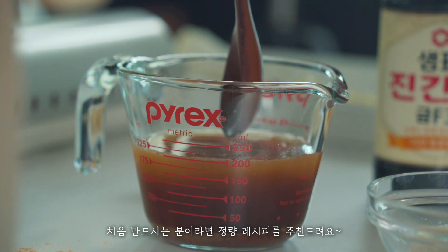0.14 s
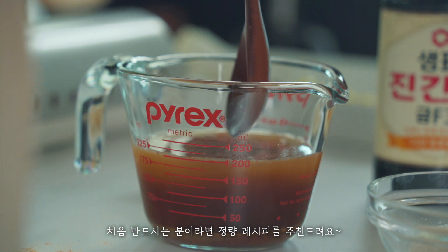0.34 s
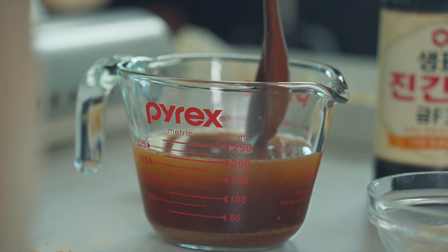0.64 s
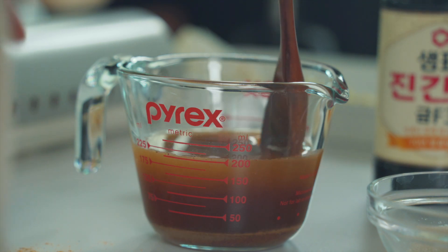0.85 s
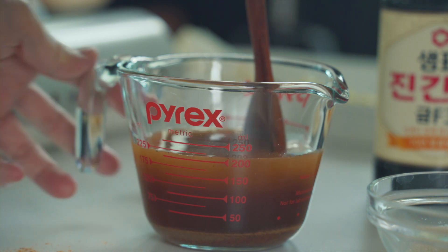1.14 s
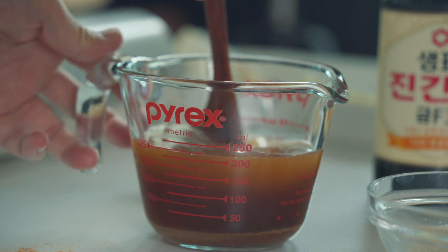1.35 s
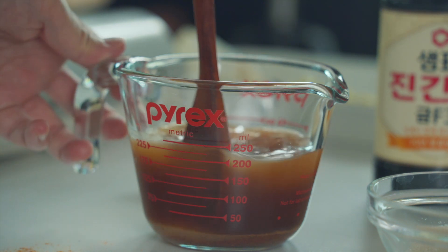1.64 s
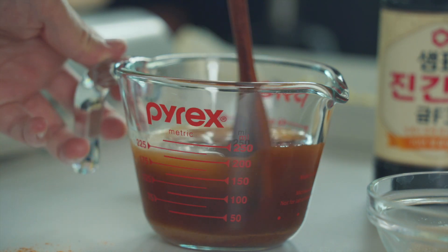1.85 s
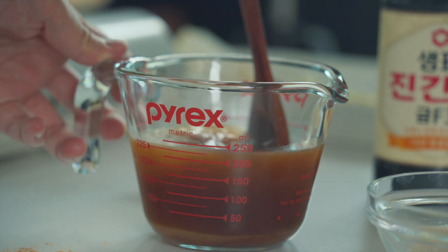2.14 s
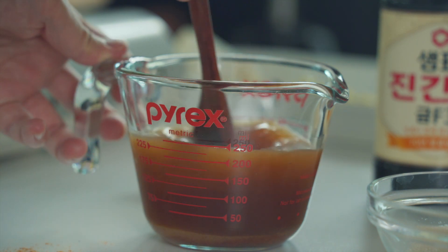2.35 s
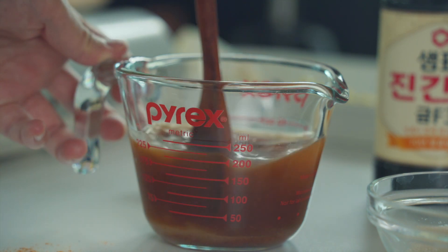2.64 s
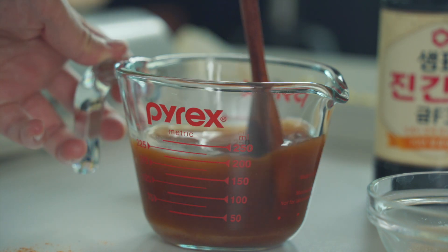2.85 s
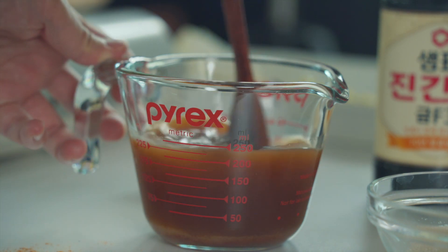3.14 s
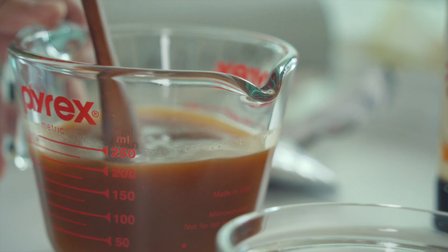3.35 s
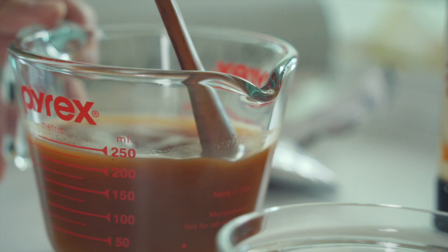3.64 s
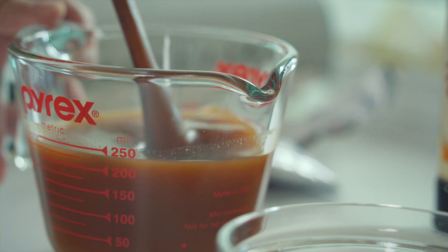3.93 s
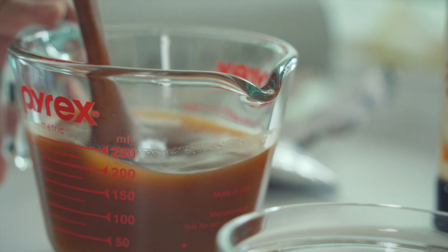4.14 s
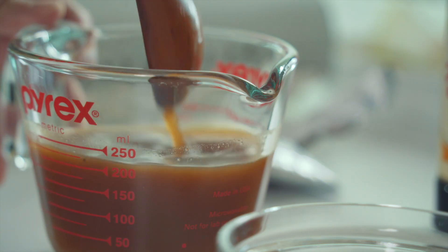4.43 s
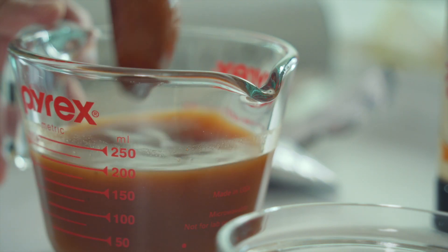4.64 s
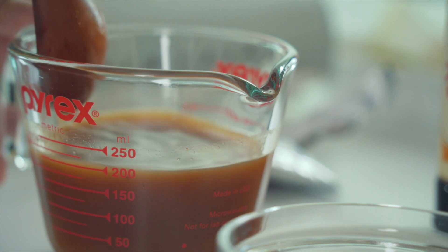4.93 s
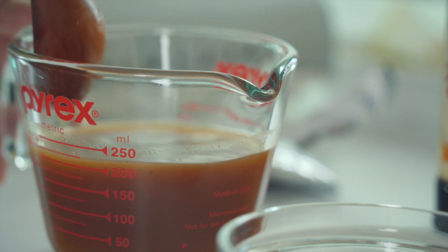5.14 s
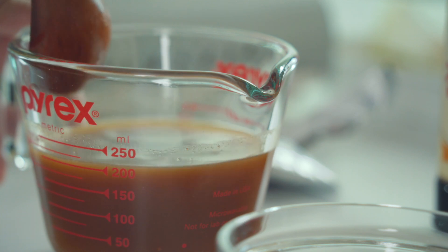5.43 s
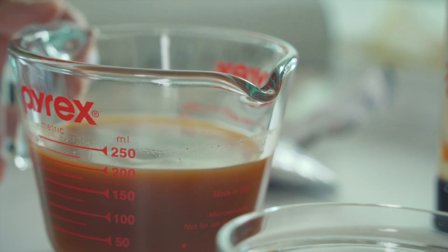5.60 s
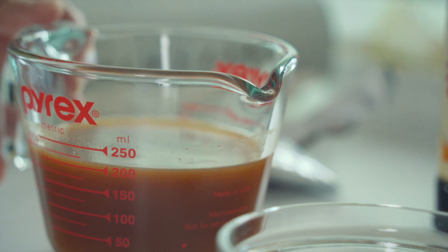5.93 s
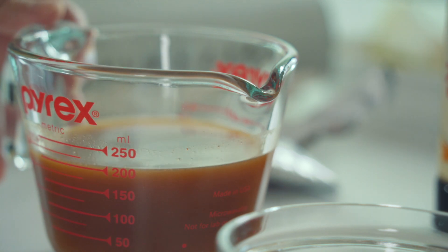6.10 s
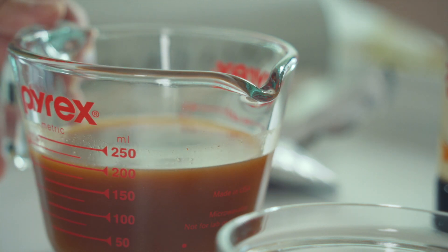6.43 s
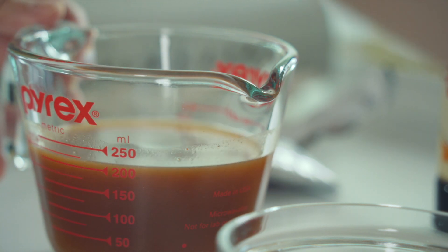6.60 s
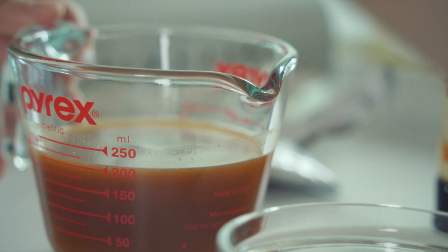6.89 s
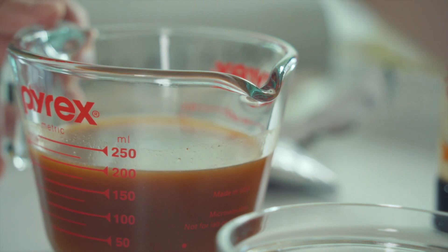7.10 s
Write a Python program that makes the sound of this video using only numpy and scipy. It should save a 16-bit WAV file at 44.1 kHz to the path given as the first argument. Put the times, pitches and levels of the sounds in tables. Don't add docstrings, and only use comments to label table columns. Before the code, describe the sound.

Close in a quiet, hard-walled kitchen with low room tone and soft hiss, a dull knock lands on the worktop with small rattles. A wooden spoon then stirs a thick glass jug with faint scuffs and irregular muted taps, densest around three seconds. Two rim knocks follow, the second harder. Finally a dish is set down and glass bowls clack brightly off to the side.

```python
import sys
import numpy as np
from scipy import signal
from scipy.fft import rfft, irfft, next_fast_len
from scipy.io import wavfile
from scipy.ndimage import uniform_filter1d

SR = 44100
rng = np.random.default_rng(int(sys.argv[2]) if len(sys.argv) > 2 else 0)


def undo_db(level):
    steps = np.asarray(level, float) / 20
    return 10 ** steps


def persist_wave(psi):
    counts = np.round(np.clip(psi, -1, 1) * 32767).astype(np.int16)
    wavfile.write(sys.argv[1], SR, np.atleast_2d(counts).T)


N = 320166


# f/Hz, level/dB per Hz
ROOM_HISS = [(12, -38), (20, 2), (88, -4), (141, -8), (181, -8.5), (233, -12), (354, -14.5), (430, -17),
             (635, -16), (839, -20), (1050, -21.5), (2170, -31), (3110, -32.5), (15700, -39.5)]
# f/Hz, t60/s
WALL_DECAY = [(125, 0.48), (500, 0.55), (2000, 0.47), (6000, 0.45), (12000, 0.44)]
WET_DB = {"jug": -7, "top": -4.5, "dish": -3, "bowl": -5.5}
# start t/s, peak t/s, end t/s, peak level/dB, brightness/6 dB steps
SLEEVE_STROKES = [
    (0.34, 0.397, 0.45, -69, 1.27),
    (.6, 1.023, 1.2, -73, -0.2),
    (5.853, 6.305, 6.8, -70.5, -0.08),
]
# f/Hz, level/dB per Hz
SHIVER_SPECTRUM = [(4900, -22), (6000, -20), (6600, 0), (7200, -18), (7900, -16), (8450, -3), (9100, -20),
                   (12000, -30)]

# t/s, board level/dB, then boom and high ring level/dB above it
KNOCKS = [
    (0.1216, -27, -17, -17),
    (0.133, -51, 11, -30),
    (.305, -48, -14, -30),
    (.315, -60, 7.5, -25),
    (.368, -50.5, -4, -2),
    (.409, -69.5, 9, -20),
]
# group, f/Hz, level/dB, t60/s
WORKTOP_MODES = [(0, 250, -9, 0.052), (0, 350, -13, 0.12), (0, 500, -5.5, 0.054), (0, 580, -1.5, .04),
                 (0, 752, -7, 0.016), (0, 921, -0.5, 0.043), (1, 69, -3, .2), (1, 96.5, 1.5, 0.23),
                 (1, 125, 1, 0.29), (2, 1480, 4, 0.033), (3, 2560, -3, .012)]
# low f/Hz, high f/Hz, level/dB, t60/s
WORKTOP_CRACK = [(150, 950, -8.5, 0.035), (50, 200, -15, 0.041), (1500, 3400, 5, .025),
                 (2260, 7000, 4.5, 0.0078), (4950, 10000, 10, 0.0034)]

# t/s, low ring level/dB
DISH_SETS = [
    (6.4222, -25),
]
DISH_SHARES_DB = (0, -4, -29.5, -28.5)
# group, f/Hz, level/dB, t60/s
DISH_MODES = [(0, 1000, -11, 0.015), (0, 1180, -10, 0.03), (0, 1304, 3, 0.076), (0, 1350, -9.5, 0.11),
              (0, 1505, -6, 0.039), (1, 2060, -3, 0.049), (1, 2130, -1, 0.048), (1, 2580, 1, .015),
              (2, 3080, -4, .11), (2, 3420, -13, .04), (2.001, 3500, -18, .1), (3, 4900, -11, .05),
              (3, 6500, 3, .015), (3, 6700, -6, .05), (4, 113.3, -1, 0.52)]
# low f/Hz, high f/Hz, level/dB, t60/s
DISH_CRACK = [(420, 1700, -7.5, 0.01), (1730, 2700, 0, 0.021), (2520, 3500, 0.5, 0.014),
              (4500, 11000, 3, .045), (80, 310, -6, 0.041)]
# t/s, level/dB, bright share level/dB
DISH_SLIDES = [
    (6.775, -70, -12.5),
    (6.868, -61.5, -9),
    (6.908, -59, -12),
    (6.922, -63, -12),
]
# low f/Hz, high f/Hz, level/dB, t60/s
SLIDE_BANDS = [(2250, 3500, 0.5, 0.04), (4500, 7000, -3, .03)]

# t/s, low ring level/dB, then second, third, bright rings level/dB above it
CLACKS = [
    (7.0005, -32, 14, -11, -33),
    (7.003, -20.8, 12, 14.5, 9.5),
    (7.0215, -29, 6, 14, -8),
    (7.0406, -27.5, 12.8, -4, -15),
    (7.0545, -32.5, 10, 13, -4),
    (7.0644, -39, 12, -3, 8),
]
# group, f/Hz, level/dB, t60/s
BOWL_MODES = [(0, 115.1, -31, 0.58), (0, 890, -8.5, 0.017), (0, 1170, -5, 0.036), (0, 1315, -1, 0.065),
              (1, 2360, 1.5, 0.017), (1, 2518, -3.5, 0.032), (2, 3300, -5.5, 0.011), (2, 3470, 1.5, 0.023),
              (3, 4440, -1.5, 0.016), (3, 4955, -9.5, 0.06), (3, 5280, 5.5, 0.024), (2.999, 5900, -5, .01),
              (3, 6300, -3.5, 0.02), (3, 6694, -2, 0.043), (4, 7800, 1, 0.0097), (4.001, 8400, 2.5, 0.011),
              (4, 9280, -11.5, 0.015), (4, 10240, -13, 0.021)]
# low f/Hz, high f/Hz, level/dB, t60/s
BOWL_CRACK = [(280, 4600, -5.5, 0.029), (1670, 3680, -5, 0.014), (2740, 3240, -7, 0.0092),
              (4340, 8700, -6, 0.011), (7500, 14800, -12.5, 0.012)]

# peak t/s, level/dB, fizz share
DRAGS = [
    (2.6, -80.5, 0.23),
    (2.75, -70, .3),
    (2.87, -65.5, .2),
    (2.95, -78, 0.45),
    (3.08, -73, .5),
    (3.17, -62, 0.5),
    (3.42, -74, .85),
    (3.52, -75, .28),
]
# group, f/Hz, level/dB, t60/s
SCUFF_MODES = [(0, 945, 0, 0.023), (0, 1480, -7.5, 0.028), (0, 1670, -4, 0.018), (0, 2120, -3, 0.025),
               (0, 2554, -4, .02), (0, 3790, -11, 0.025), (0, 4245, -12, .04)]
# t/s, ring level/dB, tick level/dB above it
RIM_SHAKES = [
    (4.9325, -46, -24),
    (5.381, -40.5, 2.5),
]
# group, f/Hz, level/dB, t60/s
RIM_MODES = [(0, 6700, -18, .01), (0, 8200, -13, 0.018), (0, 13700, -12, .01), (1.001, 215, -7.5, 0.08),
             (1.001, 400, -9, 0.08), (1, 516, -7, .03), (0.998, 1150, -8, .03), (2, 1478, 4.5, 0.11),
             (3.001, 2150, -8.5, .06), (3, 2578, 5, 0.008), (4, 3350, 5, 0.016), (4, 3750, -5.5, .06),
             (4, 4250, -6.5, 0.085)]
# low f/Hz, high f/Hz, level/dB, t60/s
RIM_CRACK = [(4960, 15400, -1.5, 0.015), (183, 1300, 5, 0.046), (1260, 2270, -6.5, 0.0078),
             (1900, 2660, 5, 0.016), (2820, 4800, 2, 0.0072)]
# t/s, tick level/dB, then thud and high rings level/dB above it
EDGE_TICKS = [(1.2248, -63, -8, -14), (1.3294, -64, -16, -21), (2.1824, -70.5, 7, 3.5),
              (2.274, -47.5, -5.5, -9.5), (2.7544, -62.5, -1, -9), (2.8501, -59, -1.5, -16),
              (2.9286, -68.5, 2, 0), (3.0057, -63.5, -10, -8), (3.089, -59, -3, -4), (3.117, -59, -5, -10),
              (3.164, -46.5, -13, -27), (3.2043, -64, -3, -16), (3.4294, -64, -6, 0),
              (3.4996, -65.5, 1, -6), (3.708, -54.5, -17, -4)]
# group, f/Hz, level/dB, t60/s
EDGE_MODES = [(0, 8000, -2, 0.0063), (1, 940, -1, 0.038), (2.001, 1700, -11, .03), (3.001, 2500, 4, 0.024),
              (4.001, 3735, -0.5, 0.028), (4, 4300, -4.5, 0.051)]
# low f/Hz, high f/Hz, level/dB, t60/s
EDGE_CRACK = [(5700, 10200, -1.5, 0.0078), (500, 1300, 3, 0.016), (1312, 1580, -2.5, 0.018),
              (1920, 3100, 3.5, 0.0074), (2994, 3200, -17, 0.0058)]
# t/s, ring level/dB, then thud, side ring, second ring level/dB above it
WALL_TAPS = [(1.1763, -56, 4.5, -14, -13), (1.2233, -71, 6, -7, -10), (1.4259, -79, 17, -8, -7),
             (1.6924, -50.5, -2, -14, -1.5), (2.1336, -56, 5, -13, -10), (2.1824, -60.5, 4, -4, -12),
             (2.6668, -56, 6, -19, -19), (2.9335, -63.5, -1, -9, -16), (3.039, -62.5, 7.5, -1, -11),
             (3.087, -61, -6, -16, -11), (3.5855, -52, -5, -5, -11)]
# group, f/Hz, level/dB, t60/s
JUG_MODES = [(0, 1462, 0.5, .15), (0, 1500, -10, .03), (1, 576, -2, .03), (1, 925, 2.5, .04),
             (1, 1185, -4.5, .03), (2.001, 1690, 5, 0.049), (3, 2140, 7, .035), (4, 2620, 3, .025)]
# low f/Hz, high f/Hz, level/dB, t60/s
JUG_CRACK = [(1200, 2000, -19, 0.0087), (450, 1100, -3, 0.02), (1500, 1600, -15, .01),
             (1900, 2600, -8, 0.012), (2320, 2900, -5, 0.008)]


def tinted(hz, db):
    size = next_fast_len(N, True)
    f = np.fft.rfftfreq(size, 1 / SR) + 1
    gain = undo_db(np.interp(np.log(f), np.log(hz), db))
    x = irfft(rfft(rng.standard_normal(size)) * gain, size)[:N]
    return x / x.std()


def walk(rate):
    hold = int(SR / rate)
    levels = np.repeat(rng.standard_normal(N // hold + 1), hold)
    return uniform_filter1d(levels, hold)[:N]


def tent(peak_s, rise_db_per_s, fall_db_per_s):
    t = np.arange(N) / SR - peak_s
    db = np.where(t < 0, rise_db_per_s * t, -fall_db_per_s * t)
    return undo_db(np.maximum(db, -120))


def bandpass(order, edges_hz, x):
    return signal.sosfilt(signal.butter(order, edges_hz, "bandpass", fs=SR, output="sos"), x)


def strike(blows, modes, push_ms, scatter_db):
    group, hz, db, t60 = np.transpose(modes)[:, :, None]
    t = np.arange(SR // 2) / SR
    out = np.zeros(N + len(t))
    chance = rng.standard_normal((len(blows), 2, len(modes), 1))
    decay = np.exp(-np.log(1000) * t / t60) * (1 - np.exp(-1000 * t / push_ms))
    sides = (-1.) ** np.arange(len(modes))[:, None]
    for (s, level_db, *above), (share, detune) in zip(blows, chance):
        group_db = np.array([0, *above])[group.astype(int)]
        gain = undo_db(level_db + group_db + db + scatter_db * share) * sides
        ring = gain * decay * np.sin(2 * np.pi * hz * (1 + 0.0032 * detune) * t)
        start = int(s * SR)
        out[start:start + len(t)] += ring.sum(axis=0)
    return out[:N]


def crack(blows, bands, push_ms, grit_db):
    t = np.arange(SR // 6) / SR
    out = np.zeros(N + len(t))
    for k, (low_hz, high_hz, db, t60) in enumerate(bands):
        narrow = SR / 2 / (high_hz - low_hz)
        shape = np.exp(-np.log(1000) * t / t60) * (1 - np.exp(-1000 * t / push_ms))
        grit = rng.standard_normal((len(blows), len(t))) * np.sqrt(narrow)
        force = undo_db(grit_db) * shape * grit
        force[:, 0] = narrow * (push_ms < 2)
        sound = bandpass(3, [low_hz, high_hz], force)
        for (s, level_db, *above), burst in zip(blows, sound):
            start = int(s * SR)
            out[start:start + len(t)] += undo_db(level_db + [0, *above][k] + db) * burst
    return out[:N]


def hit(blows, modes, bands, push_ms, scatter_db, grit_db):
    return strike(blows, modes, push_ms, scatter_db) + crack(blows, bands, push_ms, grit_db)


def room_hiss():
    return tinted(*np.transpose(ROOM_HISS)) * undo_db(-60.5 + 1.0 * walk(1.435))


def kitchen(x, first_ms=3.1, build_ms=4.7):
    t = np.arange(SR) / SR
    hz, t60 = np.transpose(WALL_DECAY)
    tail = 0
    for mid in 62.5 * 2. ** np.arange(9):
        edges = np.minimum([mid / 2 ** .5, mid * 2 ** .5], .49 * SR)
        band = bandpass(2, edges, rng.standard_normal(SR))
        fade_s = np.interp(np.log(mid), np.log(hz), t60)
        tail = tail + band * np.exp(-np.log(1000) * t / fade_s)
    tail = tail * np.clip((1000 * t - first_ms) / build_ms, 0, 1)
    return signal.fftconvolve(x, tail / np.sqrt(np.sum(tail ** 2)))[:N]


def sleeves(flicker_db=0.5, edge_db=-9):
    dull = tinted([200, 1000, 4000, 9000, 14000], [-2, -2.0, -4.5, -29, -39])
    crisp = tinted([2000, 5000, 7600, 10000, 15000], [-2.5, -6.5, -1.5, -6.5, -9.0])
    out = 0
    for start, peak, end, level_db, bright in SLEEVE_STROKES:
        stroke = undo_db(level_db) * tent(peak, edge_db / (start - peak), edge_db / (peak - end))
        out = out + stroke * (undo_db(-6 * bright) * dull + undo_db(4.9 * bright) * crisp)
    return out * undo_db(flicker_db * walk(32) - 0.5)


def bowl_shiver():
    fade = tent(6.45, 600, 12) * tent(CLACKS[0][0], 0, 600)
    return undo_db(-79) * fade * tinted(*np.transpose(SHIVER_SPECTRUM))


def worktop_knocks():
    blows = [(s, db, boom, -16, high, -4 + 1.07 * high) for s, db, boom, high in KNOCKS]
    return hit(blows, WORKTOP_MODES, WORKTOP_CRACK, push_ms=0.65, scatter_db=0.4, grit_db=-2.5)


def dish_set_down():
    blows = [(*row, *DISH_SHARES_DB) for row in DISH_SETS]
    landing = hit(blows, DISH_MODES, DISH_CRACK, push_ms=0.23, scatter_db=1.2, grit_db=-3.5)
    return landing + crack(DISH_SLIDES, SLIDE_BANDS, push_ms=5.5, grit_db=9.5)


def bowl_clacks():
    blows = [(*row, row[-1] + 6.5) for row in CLACKS]
    return hit(blows, BOWL_MODES, BOWL_CRACK, push_ms=1.1, scatter_db=-0.2, grit_db=4.5)


def swirl(per_s=160, spread_db=3.5):
    ticks = (rng.random(N) < per_s / SR) * undo_db(spread_db * rng.exponential(size=N))
    one_scuff = strike([(0.0019, 0)], SCUFF_MODES, 0.081, 0)[:SR // 2]
    ring = signal.fftconvolve(ticks, one_scuff)[:N]
    ring = ring / ring.std()
    fizz = tinted([3000, 6000, 8000, 11000, 15000], [-20, -12, -2, -14, -22]) * undo_db(3.0 * walk(60))
    rise_db_per_s, fall_db_per_s = 200, 140
    stir = undo_db(-79) * tent(1, rise_db_per_s, 2.5) * tent(4, 0, 9)
    out = stir * (ring + 0.25 * fizz)
    for s, db, fizz_share in DRAGS:
        press = undo_db(db) * tent(s, rise_db_per_s, fall_db_per_s)
        out = out + press * (ring + fizz_share * fizz)
    return undo_db(-6) * out


def rim_shakes():
    blows = []
    for s, ring_db, hard in RIM_SHAKES:
        blows.append((s, ring_db + hard, -2.2 - hard, -hard, -11 - hard, -7 + (1.55 - 1) * hard))
    return hit(blows, RIM_MODES, RIM_CRACK, push_ms=0.77, scatter_db=2.0, grit_db=-3.5)


def edge_ticks():
    blows = [(s, db, thud, thud - 7, thud - 5, high) for s, db, thud, high in EDGE_TICKS]
    return hit(blows, EDGE_MODES, EDGE_CRACK, push_ms=.2, scatter_db=2.0, grit_db=-4.0)


def wall_taps():
    blows = [(*row, row[-1] - 8) for row in WALL_TAPS]
    return hit(blows, JUG_MODES, JUG_CRACK, push_ms=0.65, scatter_db=1.5, grit_db=0.0)


def scene():
    jug = wall_taps() + edge_ticks() + rim_shakes() + swirl()
    sources = {"jug": jug, "top": worktop_knocks(), "dish": dish_set_down(), "bowl": bowl_clacks()}
    wet = kitchen(sum(undo_db(WET_DB[place]) * sound for place, sound in sources.items()))
    blows = undo_db(0.5) * (sum(sources.values()) + wet)
    return (blows + sleeves() + room_hiss() + bowl_shiver())[None]


def top_cut(x):
    return signal.sosfilt(signal.butter(12, 15840, fs=SR, output="sos"), x)


def record(dry):
    return top_cut(np.clip(dry, -1, 1))


dry = scene()
out = record(dry)
persist_wave(out)
```